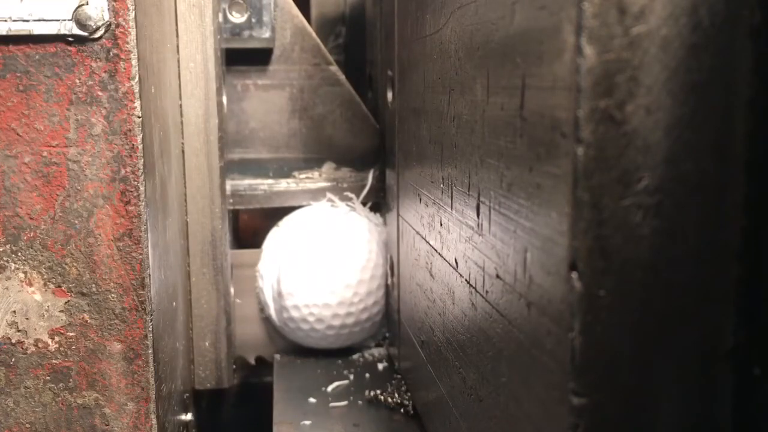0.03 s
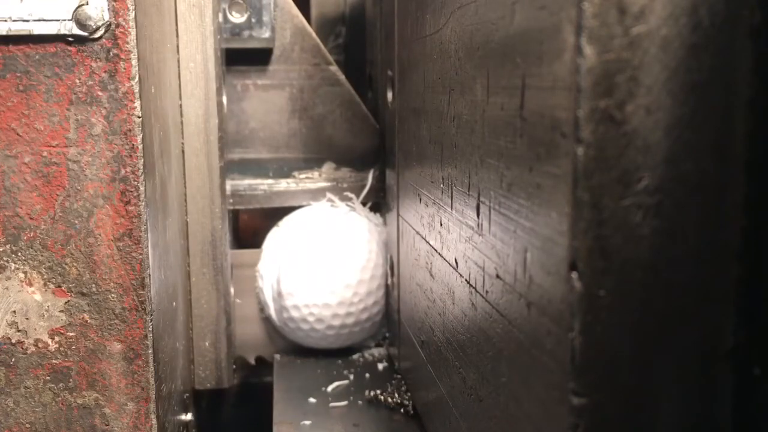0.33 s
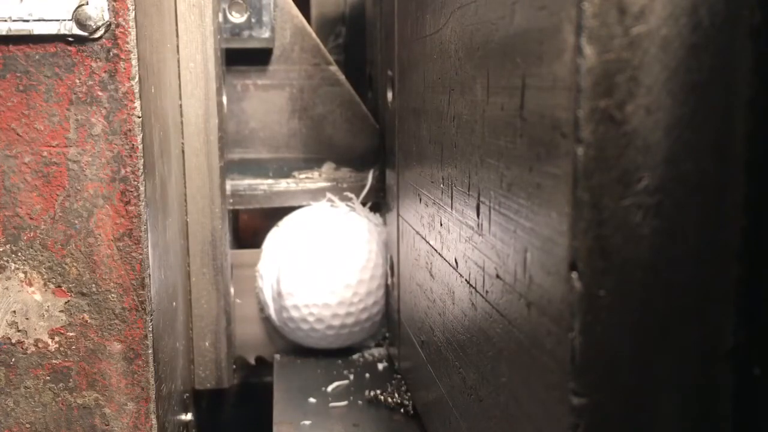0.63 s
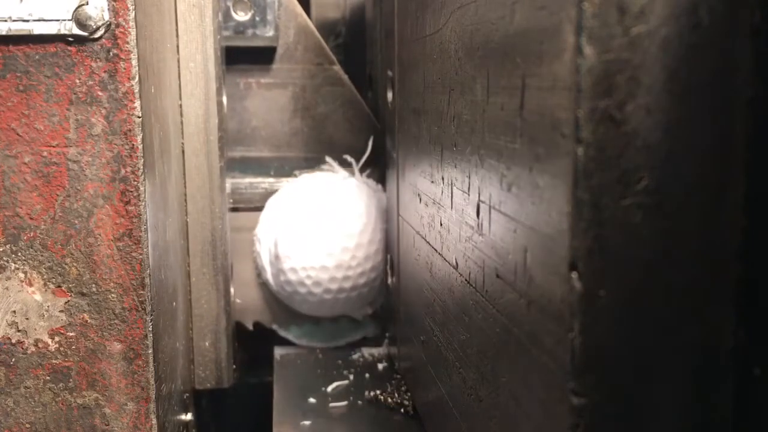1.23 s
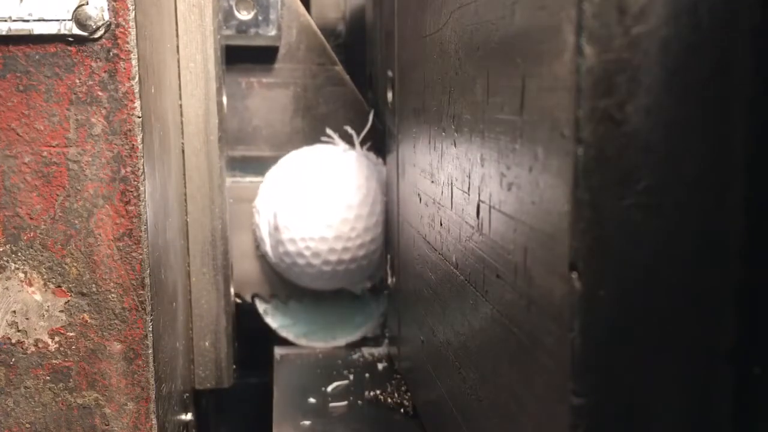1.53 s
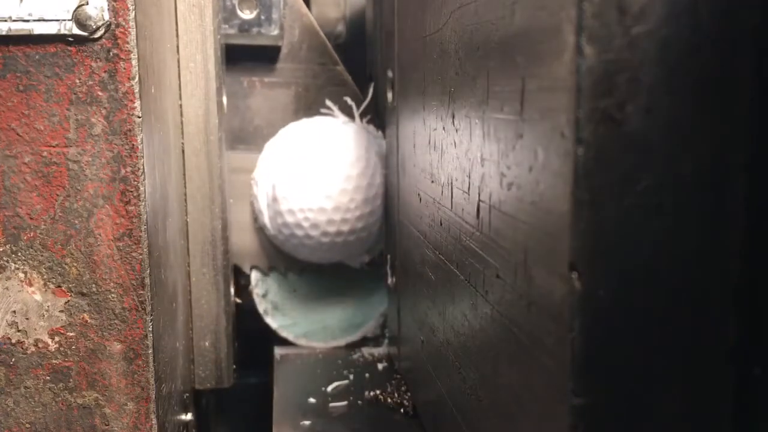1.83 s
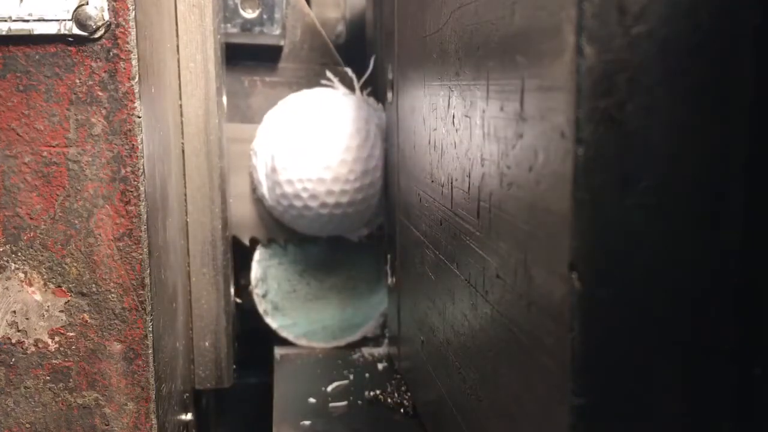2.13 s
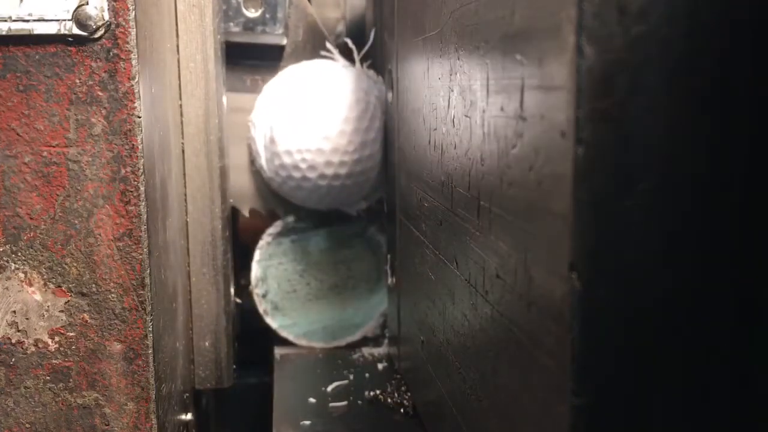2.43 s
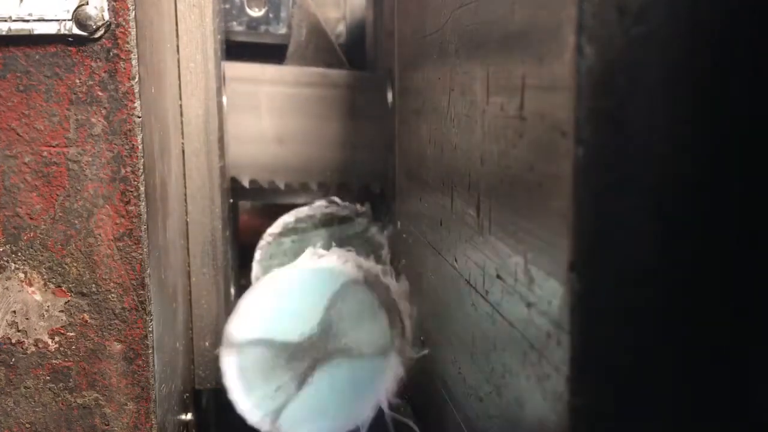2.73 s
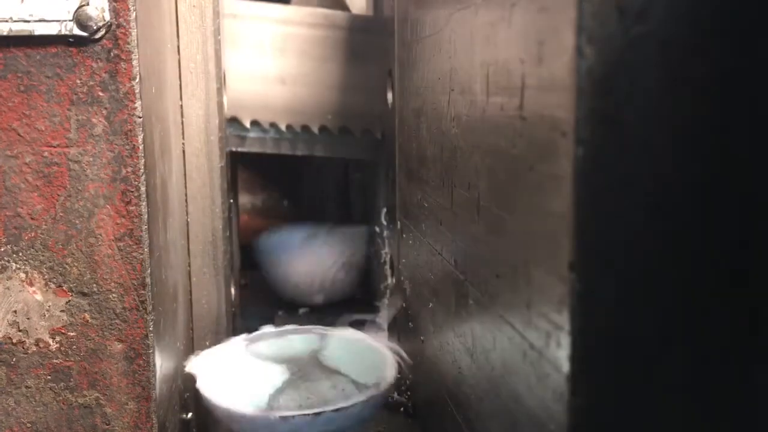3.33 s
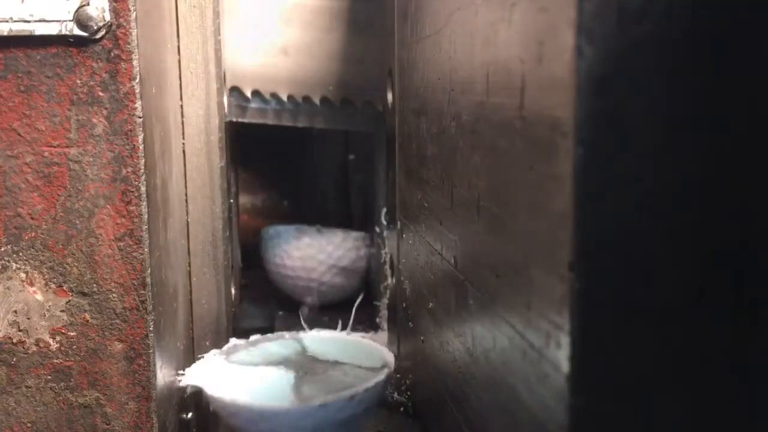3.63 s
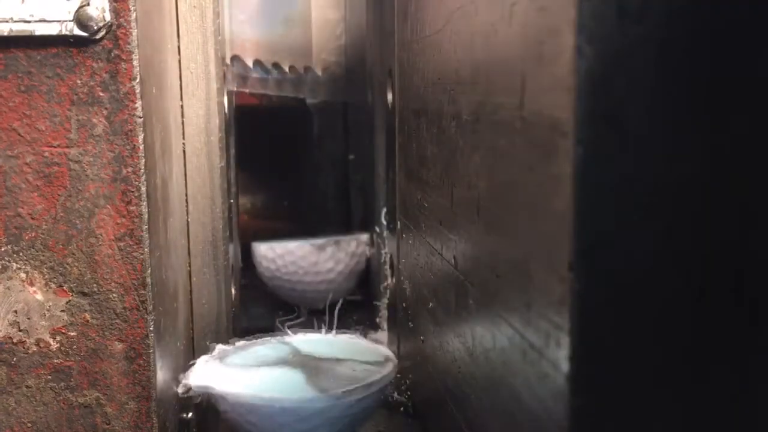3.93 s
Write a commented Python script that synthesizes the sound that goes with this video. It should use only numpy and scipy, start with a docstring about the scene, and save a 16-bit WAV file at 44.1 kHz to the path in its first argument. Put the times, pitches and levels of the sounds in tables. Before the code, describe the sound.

A band saw hums, a golf ball knocks, and its cut halves clatter onto steel.

```python
"""Band saw cutting a golf ball

A band saw hums and rumbles in a workshop while a golf ball is fed into the blade. The ball knocks
against the steel fence and sets the frame ringing. The drive sags a little and the teeth hiss
through the ball. The last bit of shell snaps and the two halves clatter down on the steel bed."""
import sys
import numpy as np
from scipy import signal
from scipy.io import wavfile

SR = 44100
rng = np.random.default_rng(int(sys.argv[2]) if len(sys.argv) > 2 else 0)


def log_audio(samples):
    """Write samples as a 16-bit WAV file to the path given in sys.argv[1]."""
    # one column per channel
    frames = np.atleast_2d(samples).T
    # limit to full scale, then quantise
    limited = np.clip(frames, -1, 1)
    pcm = np.round(limited * 32767).astype(np.int16)
    wavfile.write(sys.argv[1], SR, pcm)


N = 176400
TIME = np.arange(N) / SR

# All levels are relative. A t60 is the time a sound takes to fade by 60 dB.
# loudness of the running saw: t/s, level/dB
MACHINE_LEVEL = [(0, -1), (3.62, -1.5), (3.85, -3), (4, -5)]
# whine of the drive: t/s, f/Hz, level at f/dB, level an octave up/dB
DRIVE_WHINE = [(0, 382.5, -37.5, -36.5), (.8, 383.9, -37, -38.5), (1.0, 380.4, -35.5, -35.5),
               (1.3, 379.2, -34, -35.5), (3.55, 378.4, -33.3, -34), (4, 379, -37.5, -35.5)]
# noise of the belt, wheels and motor: f/Hz, level/dB
RUNNING_SPECTRUM = [(25, -15), (45, -15), (62, 5.5), (80, 7), (110, -5.5), (250, -9.5), (420, -14.5),
                    (620, -13.5), (1100, -24.5), (1500, -26), (2800, -31.5), (4500, -37.5), (6500, -39.5),
                    (11000, -48.5), (16000, -52)]
# one brief swell of the rumble: t/s, width/s, level/dB
RUMBLE_SWELL = (1.86, 0.033, -35)
# tone colour of that swell: f/Hz, level/dB
SWELL_SPECTRUM = [(35, -34), (55, -1), (72, 9), (110, -33), (300, -82)]
# faint whistles of the moving blade: f/Hz, level/dB
BLADE_WHISTLES = [(1560, -64), (1934, -66.5), (2186, -68.5), (2322, -65.5), (2706, -68)]
# loudness of the teeth's hiss: t/s, level/dB
HISS_LEVEL = [(.82, -76), (.9, -60), (1.6, -64), (2.4, -64.5), (2.55, -61), (2.578, -47.5), (2.635, -72),
              (2.81, -59), (2.9, -62), (4, -62)]
# tone colour of that hiss: f/Hz, level/dB
HISS_SPECTRUM = [(2000, -30), (5000, -7), (8000, -10), (12000, -9), (16000, -11.5)]
# moments when the ball catches on the teeth: t/s, length/s, level/dB
GRINDS = [(0.8342, 0.021, -28), (0.837, .002, -30), (1.127, .003, -43), (1.14, 0.0087, -45)]
# tone colour of that grinding: f/Hz, level/dB
GRIND_SPECTRUM = [(300, -10), (1000, 5), (2000, 2), (3300, -1), (4500, -2.5), (7000, -14), (9000, 0),
                  (12000, 2.5), (16000, -14)]
# tiny bright ticks, some alone and some on top of hits: t/s, level/dB, f/Hz
BRIGHT_TICKS = [(.8402, -24, 8500), (.852, -13.5, 12000), (0.9452, -26, 7990), (1.144, -33, 12520),
                (2.5992, -32, 10000), (2.6069, -16.5, 13000), (2.6175, -30, 11000), (2.6687, -24.5, 11500),
                (2.708, -22.5, 13500), (2.9368, -35, 12000), (3.0543, -23, 6800), (3.1505, -39, 11000),
                (3.391, -29.5, 11410)]
# natural tones of the saw's frame: f/Hz, level/dB, t60/s, build-up/s
FRAME_TONES = [(103.5, -6, 0.39, 0.037), (146, 2.5, 0.063, 0.0079), (188.5, -16, 0.33, 0.019),
               (228.3, -20, 0.31, 0.023), (641, -3, 0.051, 0.0019), (720, -14, 0.093, .0015),
               (838, -23, 0.42, 0.0013), (908, -20, 0.068, 0.00073), (1248, -26.5, 0.068, 0.0016),
               (1947, -31, 0.11, 0.0013), (2737, -35, 0.17, 0.00088), (3260, -47, 0.43, .001),
               (3320, -30, 0.08, 0.00062), (3480, -38.5, 0.2, 0.0009)]
# dense ringing of the struck sheet metal: f/Hz, level/dB
SHEET_SPECTRUM = [(40, -9), (130, 3), (300, 2.5), (480, -7), (750, -10.5), (1400, -24), (3200, -23),
                  (4200, -40), (7500, -35), (12000, -32), (16000, -44)]
# shell snap and hits of the ball and halves: t/s, tock level/dB, tock f/Hz, crack level/dB, crack f/Hz
HITS = [(0.8516, -7.5, 1220, -26.5, 4500), (1.141, -20.5, 1100, -44, 9500), (2.6073, 0, 1000, -10.5, 7150),
        (2.6687, -12, 1070, -23.5, 6500), (2.694, -8, 1310, -36, 11000), (2.7072, -6.5, 1860, -18, 8900),
        (2.737, -28, 3020, -46, 4000), (2.7479, -11, 1550, -29, 11000), (2.7753, -22, 1000, -25, 14200),
        (2.7782, -21, 2120, -21, 7450), (2.7942, -20, 1400, -46, 11000), (2.8227, -14, 3180, -23.5, 4700),
        (2.831, -16.5, 860, -43, 11000), (2.8418, -22, 1400, -44, 11000)]
# natural tones of the steel bed that the halves land on: f/Hz, level/dB, t60/s
BED_TONES = [(556.6, -18.5, 0.028), (904, -8.5, 0.0087), (2100, -26, 0.0091), (3270, -29, 0.016)]
# touches on the blade: t/s, pair level/dB, pair f/Hz, extra tone level/dB, extra tone f/Hz
BLADE_PINGS = [(1.146, -43, 5820, -36, 15680), (2.7767, -40, 5800, -35, 13300),
               (2.8223, -41.5, 5540, -36, 3270)]
# the blade's pair of close tones: multiple of the pair's f, level/dB, t60/s
BLADE_PAIR = [(1, 0, 0.06), (1.088, 3.5, 0.034)]
# the halves rocking between bounces: start/s, end/s, level/dB
RATTLE_SPAN = (2.69, 2.86, -32.5)
# boosts (+) and dead spots (-) of the steel recess around the blade: f/Hz, level/dB, width/Hz
RECESS_BANDS = [(1124, 4, 230), (1510, -3, 610), (3146, 4.5, 47), (5170, -6, 310), (7680, -3.5, 470),
                (10560, -4, 460)]


def from_db(db):
    """Turn decibels into a number to multiply by."""
    return 10 ** (np.asarray(db) / 20)


def rms_one(x):
    """Scale a signal so that its average strength (rms) is 1."""
    return x / np.sqrt(np.mean(x ** 2) + 1e-20)


def in_time(rows):
    """Join a table's points with straight lines, giving one curve for each column after the time."""
    times, *columns = np.transpose(rows)
    return [np.interp(TIME, times, column) for column in columns]


def drift(per_second):
    """A random wobble of strength 1 that heads for a new value so many times a second."""
    points = rng.standard_normal(int(per_second * N / SR) + 2)
    return rms_one(np.interp(TIME * per_second, np.arange(len(points)), points))


def band(x, low, high):
    """Keep the part of a sound between two frequencies."""
    edges_hz = [min(low, .4 * SR), min(high, .45 * SR)]
    return signal.sosfilt(signal.butter(2, edges_hz, "band", fs=SR, output="sos"), x)


def noise(spectrum, flicker_db=0):
    """Noise of strength 1, built from third-octave bands that can each flicker in level."""
    edges = 22 * 2 ** (np.arange(30) / 3)
    hz, db = np.transpose(spectrum)
    white = rng.standard_normal((2, N))
    out = 0
    for k, (low, high) in enumerate(zip(edges, edges[1:])):
        level = np.interp(np.log(low * high) / 2, np.log(hz), db)
        flicker = flicker_db * drift(20) if flicker_db else 0
        out += band(white[k % 2], low, high) * from_db(level + flicker)
    return rms_one(out)


def decay(start, t60):
    """A loudness curve that jumps to 1 and dies away."""
    age = np.maximum(TIME - start, 0)
    return (TIME >= start) * np.exp(-np.minimum(np.log(1000) * age / t60, 40))


def rise(start, seconds):
    """A loudness curve that builds up towards 1."""
    return 1 - np.exp(-np.maximum(TIME - start, 0) / seconds)


def ring(start, hz, t60):
    """One fading tone of a struck object."""
    out = np.zeros(N)
    span = slice(int(start * SR) + 1, int((start + 2 * t60) * SR))
    age = TIME[span] - start
    out[span] = np.exp(-np.log(1000) * age / t60) * np.sin(2 * np.pi * hz * age)
    return out


def crack(white, start, hz, broad_gain=0, octaves=.36):
    """A tiny burst of noise around one pitch; broad_gain mixes in the unfiltered burst."""
    burst = white * decay(start, t60=.0075)
    return band(burst, hz / 2 ** octaves, hz * 2 ** octaves) + broad_gain * burst


def drive(wander_hz=.34, flutter_db=.79, third_harmonic_db=-64.5):
    """The drive whines, and its pitch sags a little under load."""
    hz, first_db, octave_db = in_time(DRIVE_WHINE)
    phase = 2 * np.pi * np.cumsum(hz + wander_hz * drift(20)) / SR
    whine = sum(from_db(db + flutter_db * drift(40)) * np.sin(k * phase)
                for k, db in enumerate((first_db, octave_db, third_harmonic_db), 1))
    return np.sqrt(2) * whine


def motor(hz=175.3, beats_per_s=2.02, quiet_at_s=.355):
    """Two close motor tones slip in and out of step, so the hum throbs."""
    phase = 2 * np.pi * hz * TIME
    slip = np.pi * beats_per_s * (TIME - quiet_at_s)
    lower = from_db(-42.5) * np.sin(phase - slip)
    upper = from_db(-41.5) * np.sin(phase + slip)
    return np.sqrt(2) * (lower - upper)


def wheels_and_belt():
    """The wheels and belt rumble and rush; the rumble swells once."""
    peak_s, width_s, db = RUMBLE_SWELL
    swell = from_db(db) * np.exp(-.5 * ((TIME - peak_s) / width_s) ** 2) * noise(SWELL_SPECTRUM)
    return from_db(-34) * noise(RUNNING_SPECTRUM, flicker_db=1.06) + swell


def whistles(width_hz=34):
    """The blade rubs in its guides, which keeps it whistling faintly."""
    return sum(from_db(db) * rms_one(band(rng.standard_normal(N), hz - width_hz / 2, hz + width_hz / 2))
               for hz, db in BLADE_WHISTLES)


def teeth(attack_s=.0024, rough_db=5.5):
    """The teeth hiss as they cut, with short rough grinds where the ball catches."""
    hiss_db, = in_time(HISS_LEVEL)
    hiss = from_db(hiss_db) * noise(HISS_SPECTRUM)
    grind = rms_one(noise(GRIND_SPECTRUM) * from_db(rough_db * drift(1000)))
    catches = 0
    for start, length, db in GRINDS:
        hold_then_fade = np.where(TIME < start + length, 1, decay(start + length, t60=.021))
        catches += from_db(db) * rise(start, attack_s) * hold_then_fade
    return hiss + catches * grind


def bright_ticks():
    """Tiny bright ticks, some alone, some the sharp top of the knock, snap and bounces."""
    white = rng.standard_normal(N)
    return sum(from_db(db) * crack(white, start, hz) for start, db, hz in BRIGHT_TICKS)


def frame_knock(start=.8412):
    """The ball slams into the fence: the frame's low tones build slowly and sheet metal rings on."""
    tones = sum(from_db(db) * rise(start, build_s) ** 2 * ring(start, hz, t60)
                for hz, db, t60, build_s in FRAME_TONES)
    sheet_metal = from_db(-19.5) * decay(start, t60=.28) * noise(SHEET_SPECTRUM)
    return tones + sheet_metal


def clatter(attack_s=.00039, bass_cut_hz=516):
    """Each hit is a dull tock with a bright crack, and briefly rings the steel bed."""
    white = rng.standard_normal(N)
    out = 0
    for start, tock_db, tock_hz, crack_db, crack_hz in HITS:
        tock = ring(start, tock_hz, t60=.0031)
        bed = sum(from_db(db) * ring(start, hz, t60) for hz, db, t60 in BED_TONES)
        out += from_db(tock_db) * rise(start, attack_s) * (tock + bed)
        out += from_db(crack_db) * crack(white, start, crack_hz, broad_gain=from_db(-9))
    # something this small gives off little bass
    return signal.sosfilt(signal.butter(2, bass_cut_hz, "high", fs=SR, output="sos"), out)


def blade_pings():
    """The blade pings with two close tones and one extra, set by where it is touched."""
    out = 0
    for start, pair_db, pair_hz, extra_db, extra_hz in BLADE_PINGS:
        pair = sum(from_db(pair_db + db) * ring(start, pair_hz * ratio, t60)
                   for ratio, db, t60 in BLADE_PAIR)
        out += pair + from_db(extra_db) * ring(start, extra_hz, t60=.024)
    return out


def rattle(count=36, low_hz=446.3, high_hz=1330, spread_db=.5):
    """The halves settle with many small, dull taps."""
    start, end, db = RATTLE_SPAN
    out = 0
    for when, softness, pitch in rng.random((count, 3)):
        tap_s = start + (end - start) * np.sqrt(when)  # taps crowd towards the end
        tap_db = db + 2 * spread_db * (1 - softness)
        tap_hz = low_hz * (high_hz / low_hz) ** pitch
        out += from_db(tap_db) * ring(tap_s, tap_hz, t60=.016)
    return out


def workshop(x, treble_cut_hz=3500):
    """The room answers with a short, dull echo."""
    treble_cut = signal.butter(1, treble_cut_hz, fs=SR, output="sos")
    tail = signal.sosfilt(treble_cut, rng.standard_normal(N)) * decay(0, t60=.05)
    tail /= np.sqrt(np.sum(tail ** 2))
    return signal.fftconvolve(x, tail)[:N] * np.sqrt(2 * treble_cut_hz / SR)


def recess(x):
    """The steel walls around the blade boost some pitches and swallow others."""
    for hz, db, width_hz in RECESS_BANDS:
        narrow_band = signal.lfilter(*signal.iirpeak(hz, hz / width_hz, fs=SR), x)
        x = x + (from_db(db) - 1) * narrow_band
    return x


def scene():
    """The running saw, the knock and the falling halves, all heard inside the recess."""
    machine_db, = in_time(MACHINE_LEVEL)
    machine = from_db(machine_db) * (drive() + motor() + wheels_and_belt() + whistles() + teeth())
    small_hits = clatter() + rattle() + bright_ticks() + blade_pings()
    mix = machine + frame_knock() + small_hits + from_db(-5) * workshop(small_hits)
    return recess(mix)[None]


def record(dry):
    """Cut away the very highest treble, above 15900 Hz."""
    return signal.sosfilt(signal.ellip(10, .1, 80, 15900, fs=SR, output="sos"), dry)


dry = scene()
out = record(dry)
log_audio(out)
```